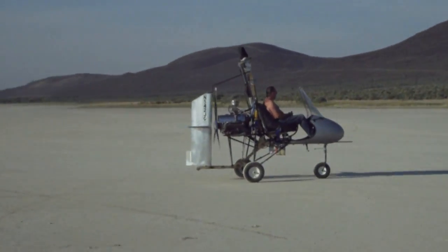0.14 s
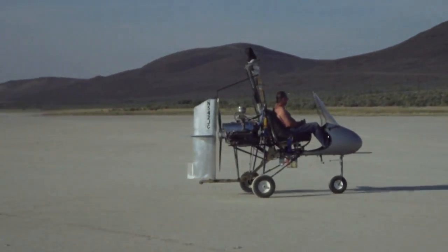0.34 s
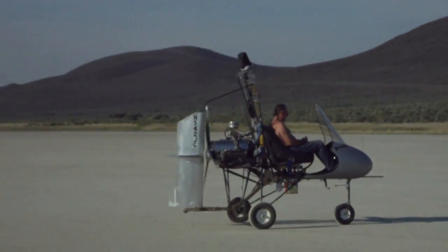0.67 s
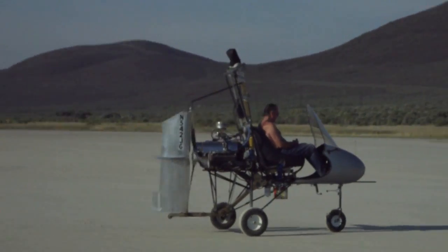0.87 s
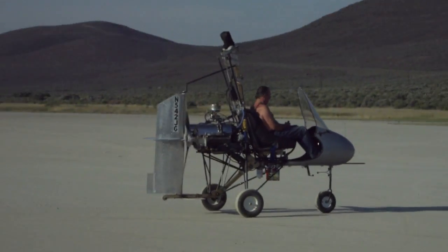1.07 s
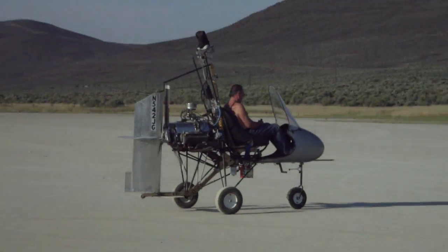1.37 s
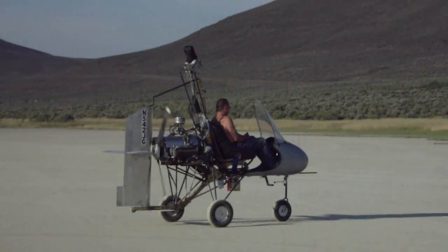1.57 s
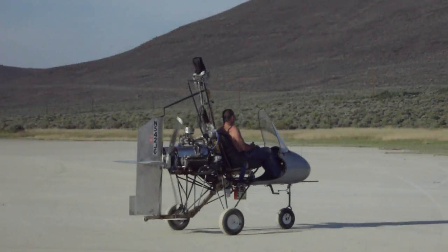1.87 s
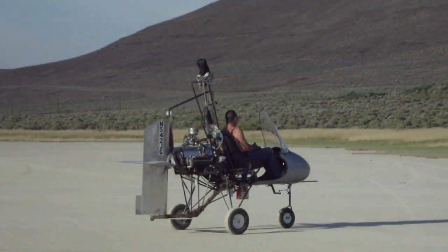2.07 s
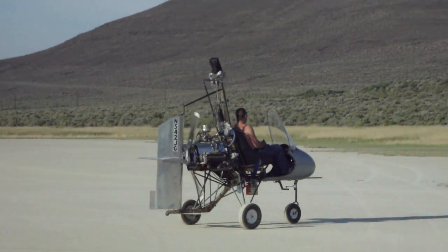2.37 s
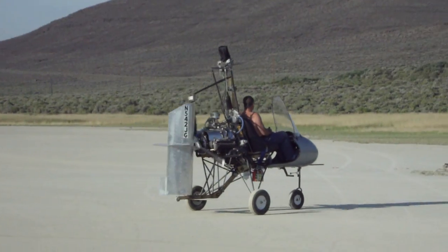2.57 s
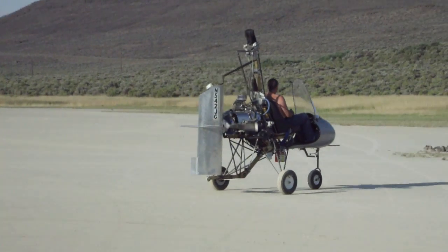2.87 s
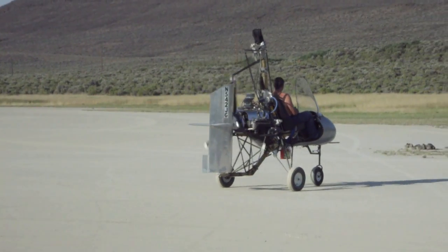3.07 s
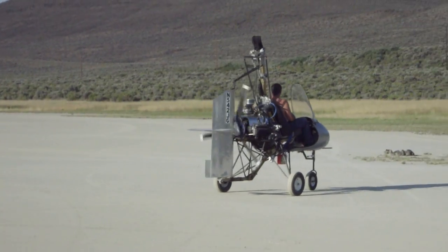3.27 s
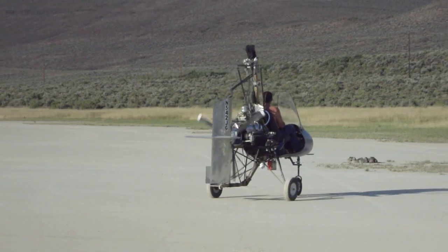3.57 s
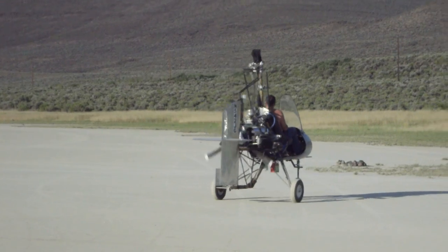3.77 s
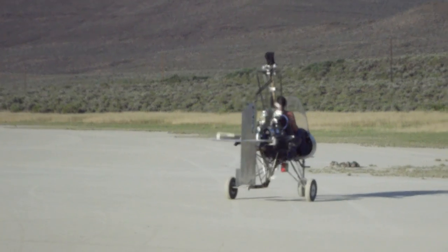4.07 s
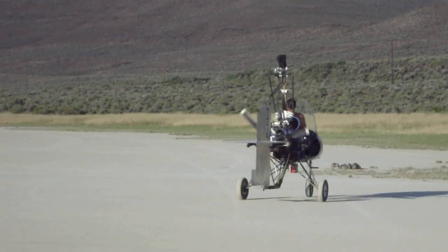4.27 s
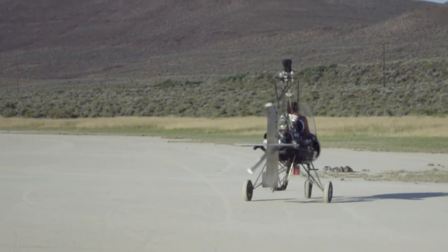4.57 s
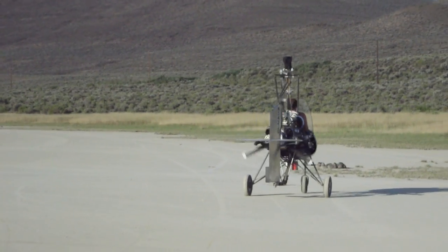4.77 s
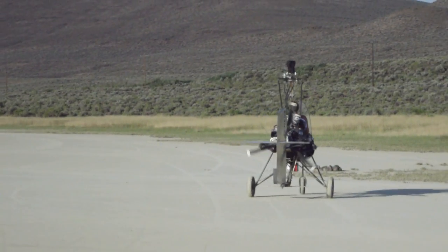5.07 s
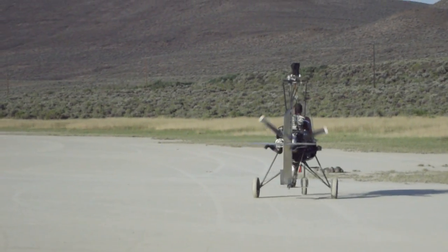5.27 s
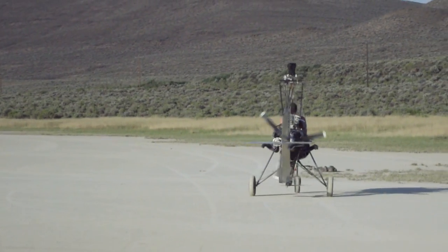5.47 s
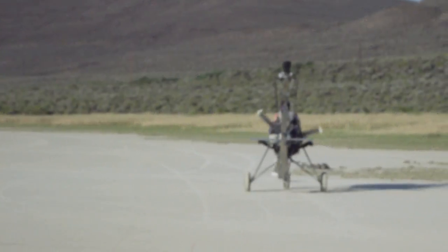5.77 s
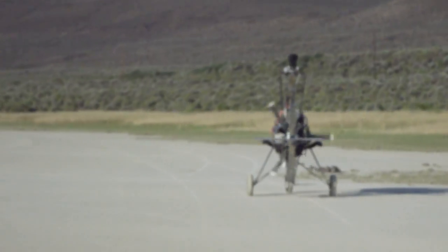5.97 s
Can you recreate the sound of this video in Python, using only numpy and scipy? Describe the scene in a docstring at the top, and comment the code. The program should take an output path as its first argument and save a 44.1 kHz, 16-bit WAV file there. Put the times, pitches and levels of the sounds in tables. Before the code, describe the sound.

A gyroplane taxis past on open ground, its piston engine revving with a throbbing exhaust bark, propeller buzz and metallic rattle that slightly overload the microphone. After about two seconds the throttle shuts and it sinks to a chuffing idle. Metal squeals briefly, the engine picks up a little, and a second squeal follows. At the end a camcorder's focus motor buzzes right by the microphone, over faint whine and hiss.

```python
"""A gyroplane taxis over a dry lake bed, seven to nine metres from a camcorder's microphone.
First it revs past: four cylinders throb and bark, the pusher propeller buzzes, loose metal rattles,
and the microphone overloads. At two seconds the throttle shuts and it sinks to idle, one cylinder
chuffing once a cycle. It turns its tail to us, squeals briefly and opens up a little. Near the end
comes a second squeal, then the focus motor ticks over the camcorder's steady whine and hiss."""
import sys
import numpy as np
from scipy import signal
from scipy.fft import rfft, irfft, next_fast_len
from scipy.io import wavfile
from scipy.ndimage import uniform_filter1d

SR = 44100
rng = np.random.default_rng(int(sys.argv[2]) if len(sys.argv) > 2 else 0)


def int16_out(signal):
    """Quantize to a 16-bit WAV file."""
    q = np.round(np.clip(np.atleast_2d(signal).T, -1, 1) * 32767)
    wavfile.write(sys.argv[1], SR, q.astype(np.int16))


N = 270333
TIME = np.arange(N) / SR

# The taxi path. Each row: time in seconds, distance from the microphone in metres,
# heading in degrees (0 nose on, 90 side on, 180 tail on).
TAXI_PATH = [(0, 8.2, 61.4), (.5, 7.54, 72), (1.1, 6.64, 90), (1.8, 6.7, 100), (3, 7.2, 136),
             (4, 8.24, 152), (5, 7.5, 171.4), (5.75, 8.8, 181.2)]
# Engine speed. Each row: time in seconds, four-stroke cycles per second.
ENGINE_SPEED = [(0.0, 23.54), (0.515, 32.3), (0.778, 34.12), (1.145, 34.21), (1.535, 32.43), (1.817, 31.23),
                (2.102, 24.55), (2.325, 20.73), (2.6, 18.2), (2.877, 17.38), (3.472, 18.47), (3.876, 18.47),
                (4.457, 17.76), (4.965, 21.22), (5.358, 22.1), (5.781, 22.29), (6.13, 22.17)]
# The throttle. Each row: time in seconds, setting (0 shut, 1 idle, 2 part open, 3 open).
THROTTLE_MOVES = [(0, 2.5), (.45, 3), (1.83, 3), (1.96, 1.29), (2.4, 0), (3.2, 0.5), (3.7, 1), (4.5, 1),
                  (5.1, 2), (6.13, 2)]
# Drone harmonics. Each row: multiple of the cycle rate, then relative dB at the four throttle settings.
DRONE_ORDERS = [(1, -26, -26, -31, -11), (2, -7, -6, -14, -1), (3, -13, -15, -21, -3), (4, -4, -2, -1, -14),
                (5, -5, -7, -22, -16), (6, -9, -10, -5, -7), (7, -7, -9, -24, -9), (8, -16, -11, -6, -5),
                (9, -12, -12, -28, -17), (10, -17, -17, -18, -11), (11, -21, -26, -28, -14),
                (12, -19, -14, -13, -12)]
# The engine stumbles and its drone sags. Each row: centre in seconds, length in seconds, change in dB.
ENGINE_STUMBLES = [(2.367, 0.12, -3.5), (4.4, 0.27, -2)]
# The four firings. Each row: place as a fraction of the cycle, relative strength in dB.
CYLINDER_FIRINGS = [(0.121, -3), (.38, -8.5), (.615, -0.5), (.85, -8)]
# Resonances of the chuff. Each row: pitch in Hz, relative level in dB.
CHUFF_RESONANCES = [(2500, 4.5), (3000, 8.5), (4050, -14), (6350, -9.5), (7400, -4), (8450, -0.5),
                    (9300, -6)]
# Cycles that spit harder. Each row: time in seconds, dB above the usual.
CHUFF_ACCENTS = [(2.14, 12.5), (2.22, 17), (2.32, 9), (2.465, 3.5), (2.735, 2), (2.85, 3.5), (2.91, 3),
                 (3.02, 3), (3.41, 5.5), (3.52, 4), (4.56, 2.5), (4.87, 6.5), (4.965, 5.5), (5.01, 6)]
# Metal squeals. Each row: centre in seconds, length in seconds, pitch in Hz, level in dB.
METAL_SQUEALS = [(4.08, 0.15, 2647, -23), (5.65, 0.075, 2630, -24)]
# The camcorder mechanism's whine. Each row: pitch in Hz, level in dB.
WHINE_TONES = [(7436.6, -42), (14873.2, -41.5)]
# The two microphone ports. Each row: frequency in Hz, phase of left against right in radians.
PORT_PHASE = [(450, 0), (1290, -0.029), (2400, 0.48), (3100, -0.54), (5000, -0.36), (6500, -0.98),
              (8500, -1.26), (11000, -1.48), (15000, -2.1)]

# Base levels six metres off. Each list: dB with the throttle shut, at idle, part open, open.
DRONE_BASE_DB = [-17.5, -17.5, -14.5, -12]
BARK_BASE_DB = [-25.5, -24, -23, -24]
CHUFF_BASE_DB = [-25, -25.5, -23, -24]
RATTLE_BASE_DB = [-28, -26.5, -26, -18.5]

# Tone colours at the microphone. Each row: frequency in Hz, relative level in dB.
RUMBLE_COLOUR = [(15, -13), (30, -1), (48, -10), (70, -5), (95, -4), (130, -3), (220, -15), (400, -40)]  # uneven combustion
CRACK_COLOUR = [(120, -28.5), (210, -15.5), (290, -8.5), (400, -5), (550, -9), (700, -3.5), (900, 1),
                (1230, -11.5), (1750, 0.5), (2100, -11.5), (3000, -9.5), (3600, -38), (9000, -57.5)]  # exhaust cracks
WASH_COLOUR = [(100, -8), (180, -3), (280, 5), (400, 3.5), (545, -10), (850, -4), (1210, -7.5), (1750, 2.5),
               (2060, -11), (3100, -14.5), (3700, -23.5), (5500, -31.5), (8800, -22), (10800, -30.5),
               (15000, -48)]  # exhaust gas and propeller wash
BLADE_COLOUR = [(290, -32.5), (350, -7.5), (430, -1.5), (560, -6), (680, 1), (850, 1.5), (1000, 2),
                (1250, -8), (1750, 5.5), (2100, -5), (3000, -10), (3700, -37.5)]  # propeller buzz
PUFF_COLOUR = [(300, -14), (900, -6), (1300, -9), (1900, 1.5), (3100, 2.5), (3700, -11), (5300, -23),
               (6300, -12.5), (8700, -4), (9700, -8), (10800, -29), (15000, -37)]  # breath of the chuff
RATTLE_COLOUR = [(900, -29.5), (1600, -7), (2100, -4.5), (2500, -1), (3100, -1.5), (3600, -25), (4800, -27),
                 (5600, -30), (7500, -17), (9000, -14), (10800, -37.5), (15000, -57)]  # valve gear and loose metal
CAMCORDER_COLOUR = [(500, -28), (1100, -9), (1550, -6), (2150, -23), (2500, 5), (2900, 2.5), (3150, -3),
                    (3600, -37), (4800, -20.5), (6000, -34), (9000, -41)]  # the body around the focus motor

IDLE_HZ, NEAR_M = 18, 6


def exhaust_drone(cycles, cycle_hz, throttle, pipe_hz=88, width_hz=50, leak=0.082, settle_s=0.39):
    """Low harmonics of exhaust and propeller, lifted by the pipe resonance; unsteady at low throttle."""
    slack = np.clip(1 - throttle / 2, 0, 1)
    softness = uniform_filter1d(np.sqrt(slack), int(settle_s * SR))
    waver_db = 0.73 + 2 * slack
    drone = power = 0
    for order, (_, *levels_db) in enumerate(DRONE_ORDERS, 1):
        hz = order * cycle_hz
        detune = (hz / pipe_hz - pipe_hz / hz) * pipe_hz / width_hz
        gain = by_throttle(throttle, undb(levels_db)) * np.sqrt(leak + 1 / (1 + detune ** 2))
        # the pipe smears each pulse in time, the soft idle pulses most
        smear = .02 * order ** 2 - .143 * softness * (order - len(CYLINDER_FIRINGS)) ** 2
        wave = np.sin(2 * np.pi * (order * (cycles + 0.089) - smear))
        drone += gain * undb(waver_db * wander(24)) * wave
        power += gain ** 2 / 2
    return drone / np.sqrt(power)


def combustion_rumble(throttle):
    """Uneven combustion fills the gaps between the drone's harmonics, most at low throttle."""
    return undb(np.interp(throttle, [0, 2], [-9, -16])) * colour(noise(), RUMBLE_COLOUR)


def exhaust_bark(cycles, throttle, scatter_db=1.48, gas_decay_s=0.0048, wash_db=-6, overrun_db=3):
    """Four cracks a cycle, each trailed by gas noise, over propeller wash; blade buzz grows with speed."""
    pulses = 0
    for place, db in CYLINDER_FIRINGS:
        times = passing_times(cycles, place)
        timing, strength = rng.standard_normal((256, 2))[:len(times)].T
        jitter_s = np.interp(np.interp(times, TIME, throttle), [1, 2], [.0003, .00004])  # loose at idle
        pulses += clicks(times + jitter_s * timing, undb(db + scatter_db * strength))
    revs = np.interp(np.gradient(cycles) * SR, [19, 29], [0, 1])
    overrun = revs * np.clip(1 - throttle / 2, 0, 1)  # a fast engine with its throttle shut crackles
    cracks = undb(-8 + 5 * revs + overrun_db * overrun) * colour(pulses, CRACK_COLOUR)
    gas = unit(decay_tails(pulses, gas_decay_s) * noise())
    wash = undb(wash_db) * noise()
    rush = undb(-2 - 5 * revs) * colour(gas + wash, WASH_COLOUR)
    buzz = undb(-9 + 5 * revs) * propeller_buzz(cycles)
    return cracks + rush + buzz


def propeller_buzz(cycles, waver_db=2, phase_drift=0.094):
    """The blades cut the same wakes on every crank turn, two turns to a cycle: clean harmonics."""
    buzz = 0
    for harmonic in range(1, 60):
        phase = 2 * harmonic * cycles + rng.random() + phase_drift * sway(10)
        buzz += undb(waver_db * sway(10)) * np.cos(2 * np.pi * phase)
    return colour(buzz, BLADE_COLOUR)


def cylinder_chuff(cycles, cycle_hz, throttle, heading, rise_s=0.0021, scatter_db=1.43,
                   detune=0.0397, wobble=0.017, puff_db=-4):
    """Gas spits once a cycle and whistles unsteadily, shorter at speed, brighter with more throttle."""
    age = np.arange(SR // 25) / SR
    mode_hz, mode_db = np.transpose(CHUFF_RESONANCES)
    # the far cylinder bank answers weakly, best heard from astern
    far_bank_db = np.interp(heading, [140, 155], [-15, -6])
    whistle, envelope = np.zeros((2, N + len(age)))
    for place, bank_db in [(-.058, np.zeros(N)), (.522, far_bank_db)]:
        for start in (passing_times(cycles, place) * SR).astype(int):
            span = slice(start, start + len(age))
            fall = age * cycle_hz[start] / IDLE_HZ / 0.0047
            burst = (1 - np.exp(-age / rise_s)) * (1 + fall) * np.exp(-fall * np.sqrt(2))
            burst *= undb(bank_db[start] + scatter_db * rng.standard_normal())
            pitch, strength, phase = rng.standard_normal((3, len(mode_hz)))
            jitter = rng.standard_normal((len(age), len(mode_hz)))
            flutter = unit(uniform_filter1d(jitter, size=64, axis=0))
            hz = mode_hz * (1 + detune * pitch + wobble * flutter)
            tones = np.sin(2 * np.pi * (np.cumsum(hz, axis=0) / SR + phase))
            tilt_db = 1.76 * (throttle[start] - 1) * np.log2(mode_hz / mode_hz[0])
            weights = unit(undb(mode_db + 2 * strength + tilt_db))
            whistle[span] += burst * (tones @ weights)
            envelope[span] += burst
    puff = colour(envelope[:N] * noise(), PUFF_COLOUR)
    return unit(whistle[:N]) + undb(puff_db) * puff


def chuff_level(cycles, cycle_hz, throttle, heading, coast_db=-17, rudder_db=-9, rudder_deg=4.2):
    """The chuff in dB: it fades when coasting or hidden behind the rudder; some cycles spit harder."""
    coasting = np.clip(2 - throttle, 0, 1) * np.interp(cycle_hz, [19.5, 22], [0, 1])
    hidden = np.exp(-((180 - heading) / rudder_deg) ** 2)
    cycle_number = np.round(cycles)
    accent_db = sum(db * (cycle_number == cycle_number[int(s * SR)]) for s, db in CHUFF_ACCENTS)
    return by_throttle(throttle, CHUFF_BASE_DB) + coast_db * coasting + rudder_db * hidden + accent_db


def metal_rattle(cycles, depth=0.25, flicker_db=2):
    """Valve gear and loose metal buzz in time with the firings."""
    shake = 1 + depth * np.cos(2 * np.pi * len(CYLINDER_FIRINGS) * cycles)
    flicker = undb(flicker_db * wander(126))
    return colour(shake * flicker * noise(), RATTLE_COLOUR)


def metal_squeals(third_db=-13, wobble=0.00418):
    """Short metallic squeals with a thin third harmonic."""
    squeals = 0
    for centre_s, length_s, hz, db in METAL_SQUEALS:
        phase = 2 * np.pi * np.cumsum(hz * (1 + wobble * wander(141))) / SR
        tone = np.sin(phase) + undb(third_db) * np.sin(3 * phase)
        squeals += undb(db) * swell(centre_s, length_s) * tone
    return squeals


def focus_motor(start_s=5.772, level_db=-20.5, jolt_db=10, jolt_s=.022, step_hz=235, grit_db=-8):
    """Right by the microphone the lens motor jolts, then ticks unevenly through the camcorder body."""
    age = TIME - start_s
    gain = (age > 0) * undb(level_db + jolt_db * np.exp(-(age / jolt_s) ** 2))
    step_rate = step_hz * np.exp(.12 * wander(150))
    times = passing_times(np.cumsum(step_rate) / SR, 0)
    grit = undb(grit_db) * noise()
    strengths = np.interp(times, TIME, undb(3 * wander(200)))
    return gain * colour(unit(clicks(times, strengths)) + grit, CAMCORDER_COLOUR)


def camcorder_whine(flutter_rad=0.17):
    """Two thin, slightly fluttering tones from the camcorder's mechanism."""
    return sum(np.sqrt(2) * undb(db) * np.sin(2 * np.pi * hz * TIME + flutter_rad * wander(40))
               for hz, db in WHINE_TONES)


def undb(db):
    """Decibels to gain."""
    return 10 ** (np.asarray(db) / 20)


def unit(x):
    """Scale to rms 1."""
    return x / np.sqrt(np.mean(x ** 2))


def curves(table):
    """The columns of a timed table at every sample."""
    seconds, *columns = np.transpose(table)
    return [np.interp(TIME, seconds, column) for column in columns]


def by_throttle(throttle, levels):
    """Blend the levels for throttle shut, idle, part open and open."""
    return np.interp(throttle, np.arange(len(levels)), levels)


def swell(centre_s, length_s):
    """A bell curve of height 1."""
    return np.exp(-(2 * (TIME - centre_s) / length_s) ** 2)


def noise():
    """White noise."""
    return rng.standard_normal(N)


def wander(rate_hz):
    """Smooth random motion of rms 1, changing about rate_hz times a second."""
    size = max(int(SR / rate_hz), 1)
    smoothed = uniform_filter1d(noise(), size, mode="wrap")
    return unit(uniform_filter1d(smoothed, size, mode="wrap"))


def sway(rate_hz):
    """Random levels joined by straight lines, rate_hz of them a second."""
    knots = np.arange(0, TIME[-1] + 1, 1 / rate_hz)
    return np.interp(TIME, knots, rng.standard_normal(len(knots)))


def colour(x, points):
    """Causal filter with the given (Hz, dB) response; the result has rms 1."""
    hz, db = np.transpose(points)
    size = 2 * next_fast_len(N)
    bin_hz = np.maximum(np.fft.rfftfreq(size, 1 / SR), 1)
    response = undb(np.interp(np.log(bin_hz), np.log(hz), db))
    cepstrum = irfft(np.log(response))
    cepstrum[1:size // 2] *= 2  # fold to minimum phase
    cepstrum[size // 2 + 1:] = 0
    return unit(irfft(rfft(x, size) * np.exp(rfft(cepstrum)))[:N])


def passing_times(cycles, place):
    """Seconds at which a running cycle count passes a given place in each cycle."""
    passes = np.arange(np.ceil(cycles[0] - place), cycles[-1] - place) + place
    return np.interp(passes, cycles, TIME)


def clicks(times, sizes):
    """One-sample pulses."""
    return np.bincount(np.clip(times * SR, 0, N - 1).astype(int), sizes, N)


def decay_tails(pulses, decay_s):
    """Each pulse leaves an exponential tail."""
    return signal.lfilter([1], [1, -np.exp(-1 / (decay_s * SR))], pulses)


def scene():
    """Open ground, no echo: one crankshaft drives the machine as it passes and turns away from us."""
    cycle_hz, = curves(ENGINE_SPEED)
    throttle, = curves(THROTTLE_MOVES)
    distance_m, heading = curves(TAXI_PATH)
    cycles = -.434 + np.cumsum(cycle_hz) / SR
    octaves_up = np.log2(cycle_hz / IDLE_HZ)
    sag_db = sum(db * swell(centre_s, length_s) for centre_s, length_s, db in ENGINE_STUMBLES)
    drone_db = by_throttle(throttle, DRONE_BASE_DB) + 3.5 * octaves_up + sag_db
    # rattle and chuff are thrown forwards, the bark backwards
    nose_on = np.maximum(np.cos(np.radians(heading)), 0)
    bark_db = by_throttle(throttle, BARK_BASE_DB) + 10 * octaves_up - 4 * nose_on
    rattle_db = by_throttle(throttle, RATTLE_BASE_DB) + 18 * nose_on
    chuff_db = chuff_level(cycles, cycle_hz, throttle, heading) + 16.5 * nose_on
    rumble = combustion_rumble(throttle)
    machine = undb(drone_db) * (exhaust_drone(cycles, cycle_hz, throttle) + rumble)
    gust_db = 0.97 * wander(31)
    machine += undb(bark_db + gust_db) * exhaust_bark(cycles, throttle)
    machine += undb(rattle_db) * metal_rattle(cycles)
    machine += undb(chuff_db) * cylinder_chuff(cycles, cycle_hz, throttle, heading)
    sound = machine * NEAR_M / distance_m + metal_squeals() + focus_motor()
    return np.array([sound, sound])


def record(dry, hiss_db=-55, flicker_db=-19, top_hz=15200):
    """The camcorder adds whine and hiss, shifts the treble's phase between its ports and clips peaks."""
    shift = np.interp(np.fft.rfftfreq(N, 1 / SR), *np.transpose(PORT_PHASE))
    spectrum = rfft(dry + camcorder_whine())
    ports = irfft(spectrum * np.exp(.5j * np.array([shift, -shift])), N)
    # the treble flickers a little between left and right
    ports += undb(flicker_db) * (ports[0] - ports[1]) * wander(400) * np.array([[1], [-1]])
    ports += undb(hiss_db) * rng.standard_normal((2, N))
    lowpass = signal.ellip(8, .2, 70, top_hz, fs=SR, output="sos")
    return signal.sosfilt(lowpass, np.clip(ports, -1, 1))


dry = scene()
out = record(dry)
int16_out(out)
```